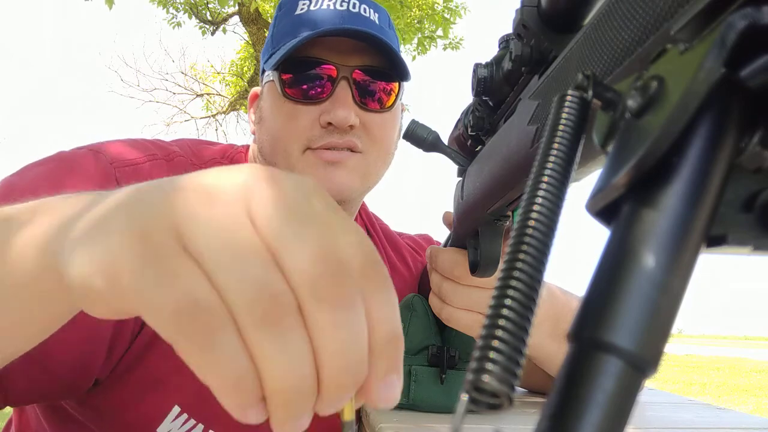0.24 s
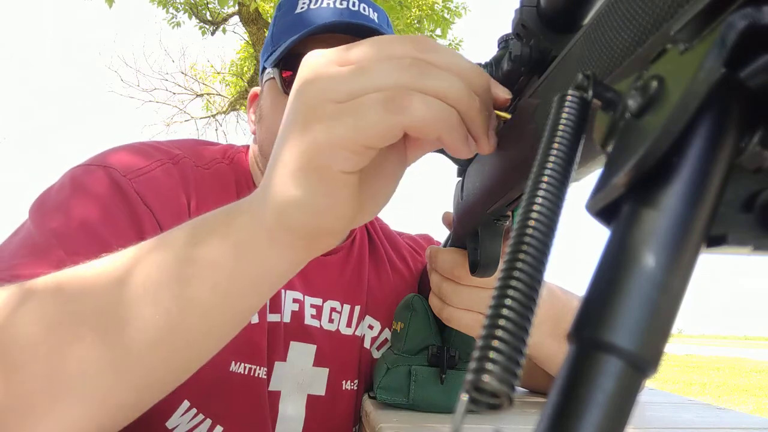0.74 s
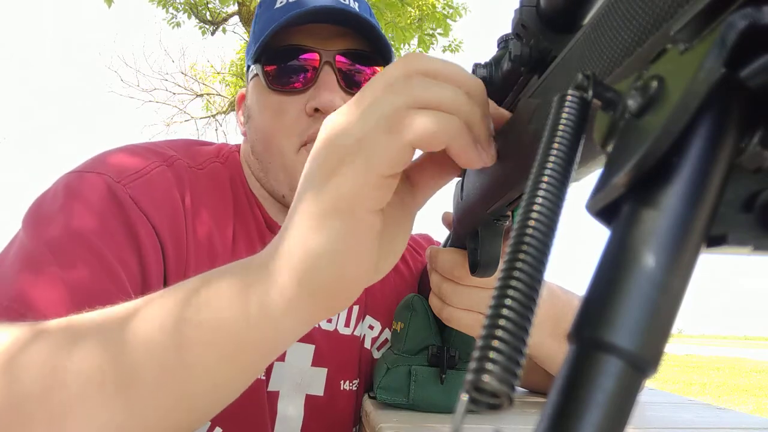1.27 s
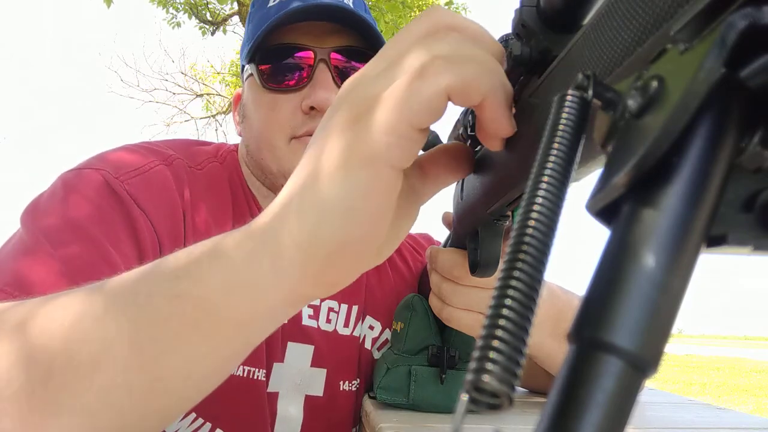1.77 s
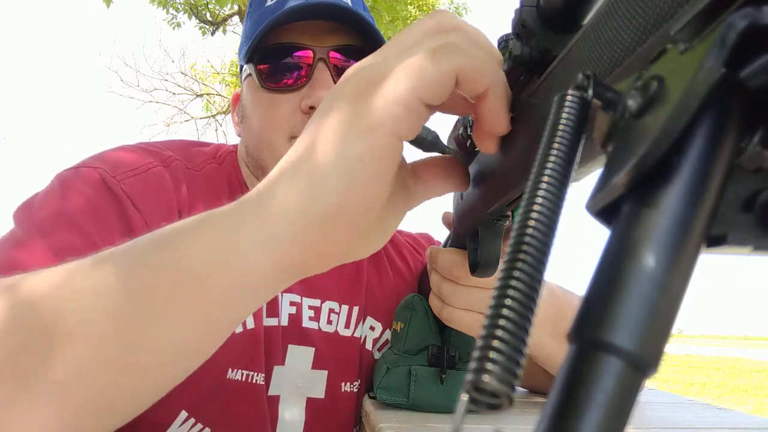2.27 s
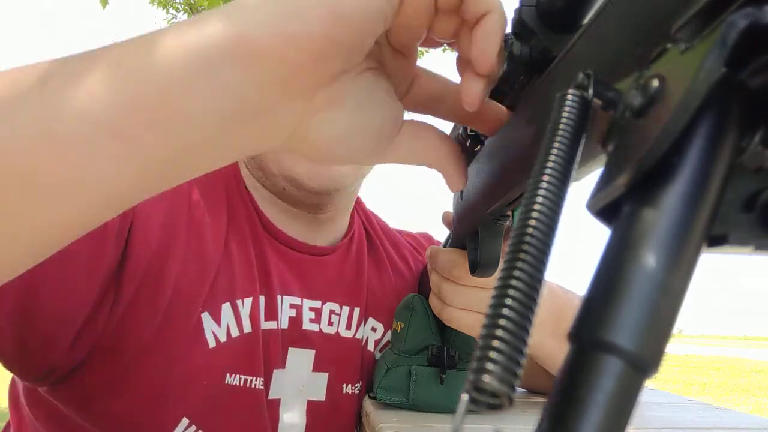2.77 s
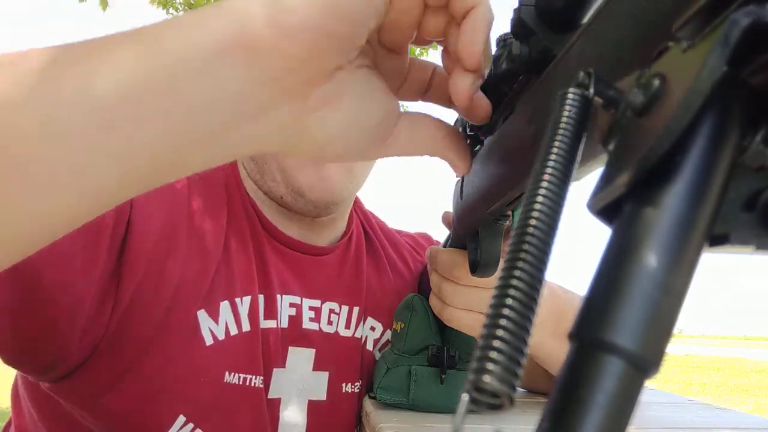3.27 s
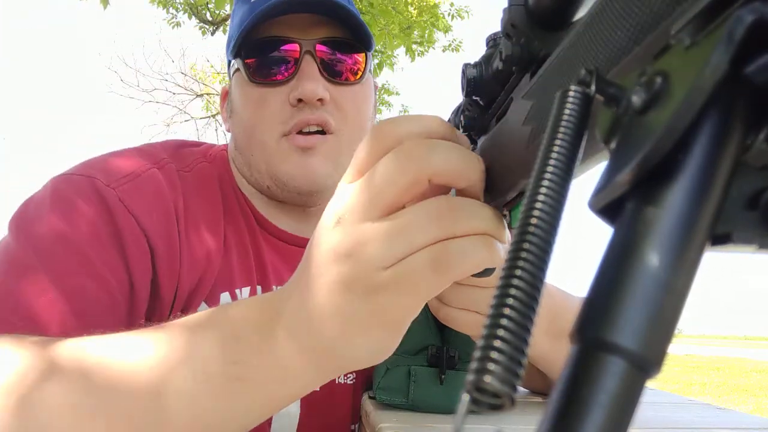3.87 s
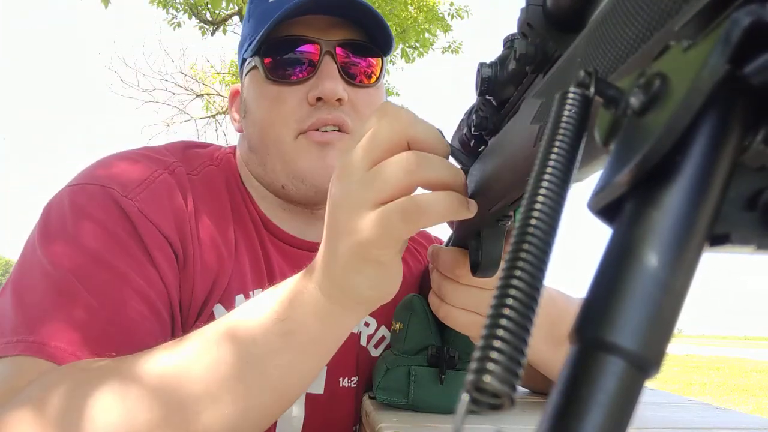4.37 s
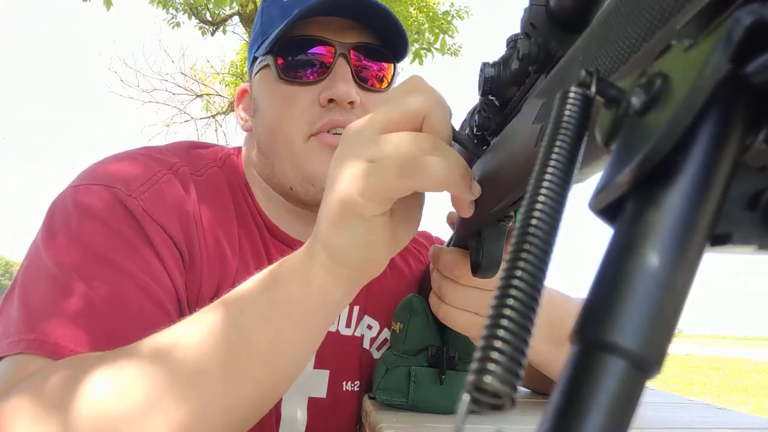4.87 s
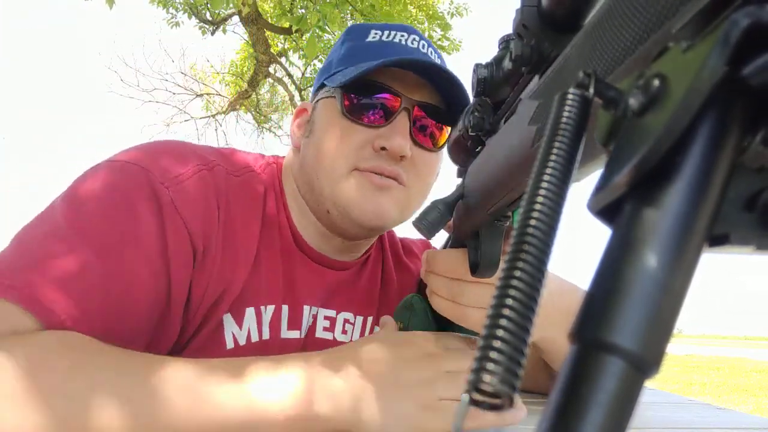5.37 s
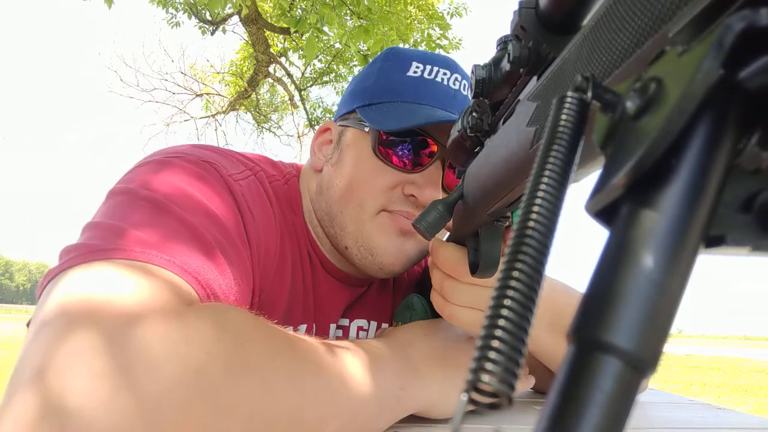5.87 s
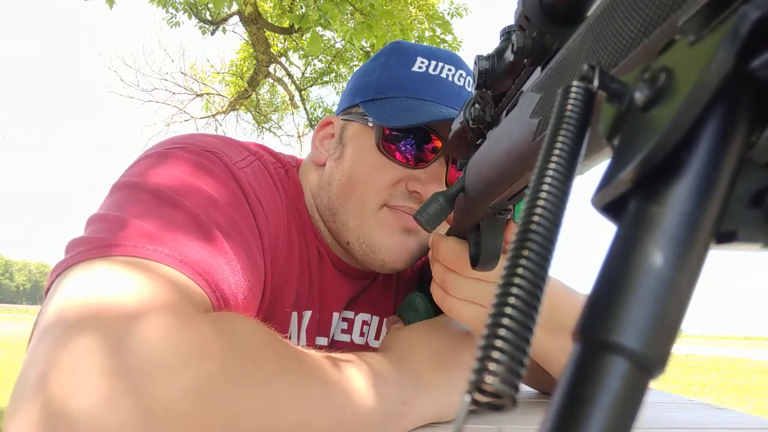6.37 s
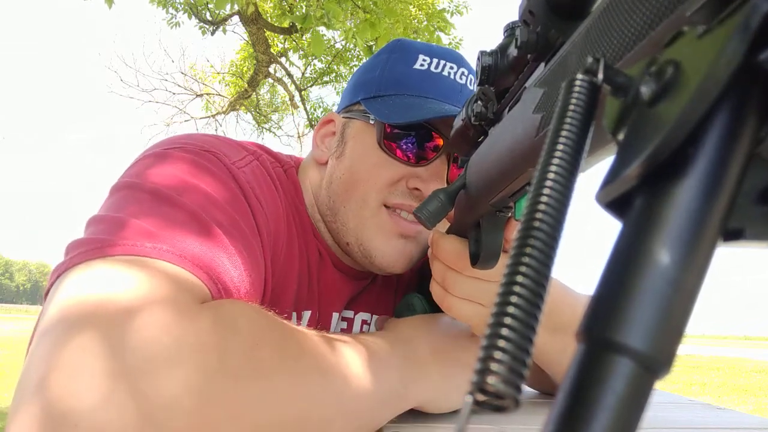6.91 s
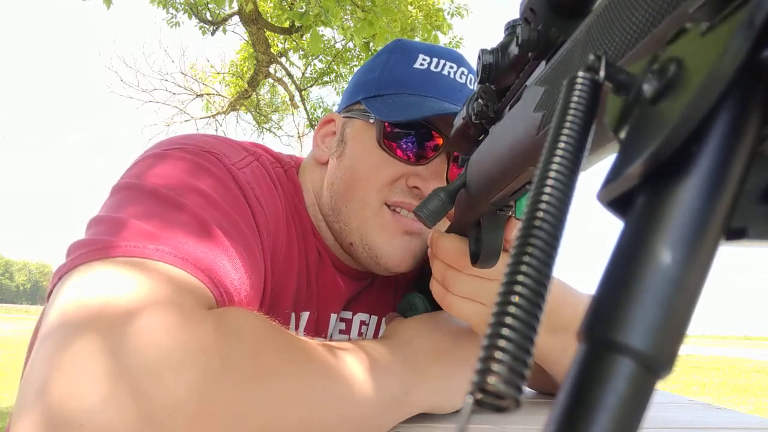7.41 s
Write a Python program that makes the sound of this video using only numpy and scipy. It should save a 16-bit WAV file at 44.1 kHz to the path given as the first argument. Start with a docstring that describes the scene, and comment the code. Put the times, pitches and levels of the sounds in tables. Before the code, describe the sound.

A rifle bolt is worked by hand outdoors: faint clicks, then quick metallic rattling ending in two sharp clacks, with distant birds chirping.

```python
"""At an outdoor bench, a cartridge is fed into a bolt-action rifle close to the microphone.
Brass and steel tick faintly, the bolt slides forward and strikes home, and its handle locks down
with two clacks. Each blow is a tiny rattle that makes the steel ring; heavy ones shake the bench.
Arms rub over the bench, a breeze bumps the microphone, and small birds call from far trees."""
import sys
import numpy as np
from scipy import signal
from scipy.fft import rfft, irfft
from scipy.io import wavfile
from scipy.ndimage import uniform_filter1d

SR = 44100
rng = np.random.default_rng(int(sys.argv[2]) if len(sys.argv) > 2 else 0)


def master(y):
    """Save y as 16-bit WAV."""
    cut = np.clip(np.atleast_2d(y).T, -1, 1)
    pcm = np.round(cut * 32767)  # scale
    wavfile.write(sys.argv[1], SR, pcm.astype(np.int16))


N = 337177

# The bolt strikes home, turns, rebounds and locks. Each row: start in seconds, level in dB,
# brightness in dB per octave, contact in seconds, fade in seconds (a fade is a drop of 60 dB).
CLACKS = [(4.9073, -8.5, .7, 0.004, .013), (5.0885, -15.5, 0.8, 0.0031, 0.026),
          (5.096, -21.5, -2.5, 0.0031, 0.0077), (5.1564, -15, -1, 0.0041, .019)]
# Where each clack lands: 0 is the breech face, 1 the cam, 2 the handle seat.
CLACK_PLACES = [0, 1, 1, 2]
# The notes of the steel action. Each row: pitch in Hz, width in Hz (widened to a minimum),
# then relative strength in dB for each of the three places.
STEEL_NOTES = [(546, 61, 2, 6, 13.5), (731, 45, -3.5, 9, 8), (933, 43, 5.5, 8.5, 7),
               (1280, 140, 10, 11.5, 9.5), (1490, 45, 3, 11, -22), (1624, 42, 0.5, 15, -3),
               (1760, 110, 10, -11, 6), (2118, 100, -1, 15, 9), (2330, 190, 3, 5, 10),
               (2710, 110, 4, 7.5, 4), (2950, 95, -3, 12.5, -17), (3600, 80, 2.5, -8.5, -5),
               (3496, 63, 1, 11.5, -21), (3860, 80, -6, 12.5, 2), (3973, 91, 3, 1.5, 4.5),
               (4167, 98, 7, 10, 10), (4950, 63, -3.5, 2.5, 6), (5160, 57, 4, 2, 9),
               (5500, 100, 6, 10.5, -7.5), (6300, 240, 4.5, 5.5, -8), (6100, 240, 8, -7, 5),
               (6500, 120, -4.5, -13, 12.5), (6884, 130, 0.5, -13, 8), (7520, 290, 7.5, 4.5, 6)]
# The tone of steel hitting steel. Each row: frequency in Hz, relative level in dB.
BLOW_TONE = [(30, -55), (130, -22), (320, -9), (700, -5), (1450, 1.5), (2400, -2), (3900, -2), (6300, -2),
             (11300, -3.5), (16000, -5.5)]
# For each place, the gain of the after-ring in dB, added to the level of the clack.
RING_DB = [-34, -33, -43]


def bolt_clacks(min_width_hz=85, notes_db=3):
    """Hard blows ring the steel in short, broad notes."""
    out = np.zeros(N)
    for (start, db, tilt_db, contact, fade), place in zip(CLACKS, CLACK_PLACES):
        notes = [(hz, max(width, min_width_hz), dbs[place] + notes_db)
                 for hz, width, *dbs in STEEL_NOTES]
        burst = rattle(contact, fade, passes=16, rise_s=.00045)
        clack = strike(burst, db, lambda f: amp(read(BLOW_TONE, f) + tilt_db * np.log2(f + 1)), notes)
        add(out, start, clack)
        add(out, start, amp(db + RING_DB[place]) * after_ring())
    return out


# The lingering notes of the rifle. Each row: pitch in Hz, relative level in dB, fade in seconds.
RING_NOTES = [(277.2, -9, 0.36), (603, -5, 0.41), (860.5, -1.5, 0.42), (1140, -2, .36), (1384, -3.5, 0.15),
              (2080, -9.5, 0.59), (2520, -0.5, .07), (2692, 0.5, 0.12), (4064, -6.5, .13), (4357, -11, .16),
              (5324, -1, 0.065), (5900, 4.5, 0.051), (6307, 3, .06), (6846, -2, .12), (7144, 3.5, .09),
              (7300, 3, 0.16), (8000, -1, .1), (9600, -3, .07)]


def after_ring():
    """Barrel, springs and bipod sing on faintly after a hard blow."""
    t = np.arange(SR // 2) / SR
    ring = sum(amp(db - 60 * t / fade) * sine(hz, t) for hz, db, fade in RING_NOTES)
    return ring * (1 - np.exp(-t / .002))


# Low thuds. Each row: start in seconds, level in dB, pitch in Hz, fade in seconds.
THUDS = [(4.916, -27, 139.5, 0.051), (5.09, -37.5, 179, 0.15), (5.158, -17.5, 239.7, 0.042),
         (5.16, -25, 138, .08), (5.177, -24, 196, 0.08), (5.159, -33, 484, .035)]


def thuds():
    """Heavy blows shake the stock and the bench."""
    out, t = np.zeros(N), np.arange(SR // 3) / SR
    for start, db, hz, fade in THUDS:
        onset = 1 - np.exp(-t / .0011)
        add(out, start, amp(db - 60 * t / fade) * np.sin(2 * np.pi * hz * t) * onset)
    return out


# The cartridge ticks against the action.
# Each row: start in seconds, level in dB, centre in Hz, width in octaves.
TICKS = [(.869, -47.5, 1790, 1.2), (.9746, -48.5, 3780, 1.1), (.982, -50, 2800, 2.3),
         (.994, -55, 3500, 3.1), (1.005, -52, 9000, .8), (1.035, -47, 3000, 3.5), (1.049, -47, 2980, 0.98),
         (1.06, -52.5, 2400, 0.68), (1.4942, -48.5, 1190, 1.16), (1.6745, -57.5, 2100, 0.95),
         (1.978, -58, 1000, 1.4), (2.1, -53, 2100, 0.63), (2.483, -62, 5900, .45),
         (3.8087, -45.5, 6000, 1.3), (4.2205, -59.5, 4500, 1.6)]
# Light knocks on bench and stock, and of the bolt along its rails. Rows are as in TICKS.
KNOCKS = [(.012, -55.5, 900, 1.7), (.194, -52, 850, 1.9), (.212, -51, 600, 2.8), (.236, -52.5, 700, 2.6),
          (3.026, -55.5, 900, 1.75), (4.4225, -44.5, 1195, 1.28), (4.478, -47.5, 2965, 4.3),
          (4.484, -40, 1700, 1.1), (4.491, -41.5, 600, 1.2), (4.528, -53, 1017, 0.89),
          (4.55, -51, 1498, 2.5), (4.5743, -38.5, 4443, 5.2), (4.656, -40, 700, 1.7),
          (4.662, -48, 850, 0.82), (4.781, -53, 604.5, 0.8), (4.7854, -42.5, 1196, 1.1),
          (4.898, -36, 2192, 1.4), (5.07, -38, 800, 1.4), (5.3588, -47.5, 6200, 0.3),
          (7.072, -60, 608, 3.1)]
# The notes of the loose cartridge in the open action.
# Each row: pitch in Hz, width in Hz, relative strength in dB.
LOOSE_NOTES = [(760, 39, 4.5), (1275, 99, 2.5), (1444, 88, 6.5), (2040, 59, 6.5), (2310, 90, 2),
               (2950, 750, 1), (3620, 130, -5), (4200, 120, 5.5), (4994, 360, 2), (5540, 110, 4.5),
               (7000, 220, 7), (7900, 230, 2.5), (10500, 500, 6)]


def touches(rows, lowest_hz, notes_db=2):
    """Light touches rattle loose parts, which give off little below their lowest note."""
    out = np.zeros(N)
    notes = [(hz, width, db + notes_db) for hz, width, db in LOOSE_NOTES]
    for start, db, centre_hz, octaves in rows:
        def tone(f):
            return hump(f, centre_hz, octaves) / np.sqrt(1 + (lowest_hz / (f + 1)) ** 8)
        fade = .035 * (1500 / centre_hz) ** .57  # brighter touches die sooner
        burst = rattle(contact_s=.0008, fade_s=fade, passes=2, rise_s=.00028)
        add(out, start, strike(burst, db, tone, notes))
    return out


def rattle(contact_s, fade_s, passes, rise_s, size=8192):
    """Metal faces chatter for a moment: a burst with all frequencies about equally strong."""
    t = np.arange(size) / SR
    decay = amp(-60 * np.maximum(t - contact_s, 0) / fade_s)
    shape = decay * (1 - np.exp(-t / rise_s)) + 1e-9
    burst = rng.standard_normal(size) * shape
    for _ in range(passes):
        burst *= shape / running_level(burst, 64)
        burst = irfft(np.exp(1j * np.angle(rfft(burst))))  # give every frequency the same strength
    return burst * shape / running_level(burst, 128)


def strike(burst, db, tone, notes):
    """A burst, coloured by how hard the contact is, wakes the notes of the metal."""
    f = np.fft.rfftfreq(len(burst), 1 / SR)
    peaks = sum(amp(note_db) ** 2 / (1 + (2 * (f - hz) / width) ** 2) for hz, width, note_db in notes)
    soft_top = amp(read([(7800, 5), (8300, 2.5), (16000, -8)], f))
    sound = irfft(rfft(burst) * prompt_filter(np.sqrt(1 + peaks) * soft_top * tone(f)))
    return amp(db) * sound * np.sqrt(.01 * SR / np.sum(sound ** 2))  # level as if it all took 10 ms


# Touches on the brass case. Each row: start in seconds, level in dB, fade in seconds.
CLINKS = [(0.196, -57.5, 0.11), (.976, -45, .07), (.982, -53, 0.058), (3.811, -35.5, 0.019)]
# The notes of the case. Each row: pitch in Hz, relative level in dB.
BRASS_NOTES = [(3230, -9), (4690, 2), (4970, -2.5), (5230, 0), (5460, 0), (10600, -15.5)]


def brass_clinks():
    """The thin case rings with a cluster of high notes, more briefly when held tight."""
    out, t = np.zeros(N), np.arange(SR // 3) / SR
    for start, db, fade in CLINKS:
        ring = sum(amp(note_db) * sine(hz, t) for hz, note_db in BRASS_NOTES)
        add(out, start, amp(db - 60 * t / fade) * ring * (1 - np.exp(-t / .0005)))
    return out


# Scrapes and rustles of steel, skin and cloth.
# Each row: middle in seconds, length in seconds, level in dB, centre in Hz, width in octaves.
RUBS = [(.02, 0.045, -53, 3430, 1.6), (0.147, 0.14, -62, 4240, 0.75), (.217, 0.08, -56.5, 1490, 0.62),
        (1.006, 0.047, -59, 5500, 1.3), (4.521, 0.2, -54.5, 2120, 1.25), (4.894, 0.037, -49, 2180, 1.8),
        (5.036, 0.14, -58, 2200, 1.7), (5.431, 0.18, -58, 4460, 1.6), (5.849, 0.65, -67, 4000, 1),
        (6.109, .12, -54.5, 378, 1.38), (6.201, 0.18, -58, 4420, 1), (6.852, 0.55, -68, 5050, 1),
        (7.122, 0.24, -61.5, 692, 1.72), (7.382, 0.054, -54.5, 4620, 0.35)]
# How the microphone colours rubs and air. Each row: frequency in Hz, relative level in dB.
MICROPHONE_TONE = [(20, 1), (7700, 2), (8300, -2.5), (16000, -1.5)]


def rubs(grain_db=3):
    """Surfaces stick and slip, breaking a swell of hiss into grains."""
    out = np.zeros(N)
    for middle, length, db, hz, octaves in RUBS:
        size = int(length * SR)
        hiss = noise(size, lambda f: hump(f, hz, octaves) * amp(2 * read(MICROPHONE_TONE, f)))
        grains = amp(grain_db * wobble(size, below_hz=200))
        add(out, middle - length / 2, amp(db) * unit_level(hiss * grains) * np.sqrt(np.hanning(size)))
    return out


# The tone of the bounce off bench and body. Each row: frequency in Hz, relative level in dB.
BOUNCE_TONE = [(150, 4), (350, 11), (700, -1), (1500, -9.5), (3000, -4.5), (7000, -1), (9000, 1.5),
               (16000, -5)]
# How long the surroundings echo. Each row: frequency in Hz, fade in seconds.
OUTDOOR_FADES = [(150, .16), (600, 0.78), (2000, 0.23), (6500, .7), (10000, .5), (15000, .25)]


def echoes(sound, near_db=-18, near_fade_s=.091, far_db=-33):
    """Sound bounces quickly off bench and body, then a thin tail returns from farther away."""
    t = np.arange(SR) / SR
    near = noise(SR, lambda f: amp(read(BOUNCE_TONE, f))) * amp(-60 * t / near_fade_s) * (t > .005)
    far_tone = [(200, 15), (900, 4), (3000, -2), (7500, -2.5), (8500, 1), (11000, -.5), (15000, -12)]
    hz, times, bands = signal.stft(noise(SR, lambda f: amp(read(far_tone, f))), SR, nperseg=256)
    bands *= amp(-60 * times / read(OUTDOOR_FADES, hz)[:, None])
    far = signal.istft(bands, SR, nperseg=256)[1][:SR] * (t > .012)
    bounces = amp(near_db) * near / np.linalg.norm(near) + amp(far_db) * far / np.linalg.norm(far)
    return signal.fftconvolve(sound, bounces)[:N]


# Puffs of wind. Each row: start in seconds, length in seconds, level in dB, centre in Hz.
GUSTS = [(0.211, 0.048, -51, 132), (0.278, 0.079, -41, 68), (0.356, 0.081, -41, 62.4),
         (.995, 0.065, -47.5, 57.5), (1.058, 0.059, -50, 73.5), (3.991, 0.087, -52.5, 59.6),
         (4.5, 0.112, -48.5, 65.6), (5.493, 0.13, -49.5, 72.3), (5.682, 0.072, -39.5, 92.7),
         (5.768, 0.045, -48.5, 85), (5.826, 0.14, -43.5, 78.5), (6.061, 0.13, -45.5, 90),
         (6.321, 0.056, -53.5, 50.3), (6.928, 0.094, -44.5, 97.5), (7.036, 0.1, -48.5, 70),
         (7.27, .11, -38.5, 102.2), (7.366, 0.1, -44, 65), (7.446, 0.14, -39, 98),
         (7.595, 0.088, -40.5, 70.4)]


def breeze():
    """Swirls of air push on the microphone in short, low gusts."""
    out = np.zeros(N)
    for start, length, db, hz in GUSTS:
        size = int(length * SR)
        swirls = noise(SR // 2, lambda f: hump(f, hz, octaves=.66))
        swirls /= running_level(swirls, 1500, mode="wrap")
        add(out, start, amp(db) * swirls[:size] * signal.windows.tukey(size, .46))
    return out


# One zigzagging twitter. Each row: seconds from its start, pitch in Hz, relative level in dB.
TWITTER_SHAPE = [(0, 3360, -18), (.012, 4700, -10.5), (.02, 5420, -11.5), (.031, 5000, -10.5),
                 (.044, 4250, -4), (0.055, 3434, -16), (.064, 3446, -6.5), (.071, 2970, -23),
                 (.081, 3550, -7), (.096, 4450, -16), (.105, 3566, -7.5), (0.115, 3170, -12),
                 (0.123, 2860, -23)]
# Its repeats. Each row: start in seconds, level in dB.
TWITTERS = [(2.325, -50), (3.445, -49.5), (5.336, -47), (7.323, -48)]


def bird_twitters(rasp=.032):
    """A bird repeats one whistled figure, its pitch shaking."""
    out = np.zeros(N)
    times, hz, db = np.transpose(TWITTER_SHAPE)
    t = np.arange(0, times[-1], 1 / SR)
    for start, level_db in TWITTERS:
        pitch = np.interp(t, times, hz) * (1 + rasp * wobble(len(t), below_hz=300))
        loudness = amp(level_db + np.interp(t, times, db))
        add(out, start, loudness * np.sin(2 * np.pi * np.cumsum(pitch) / SR))
    return through_trees(out, haze_db=-2.5, fade_s=.53)


# One bird peeps on a single note. Each row: start in seconds, level in dB.
PEEPS = [(.46, -68), (1.44, -60), (1.82, -69), (2.065, -67), (2.565, -69), (2.875, -66.5), (3.61, -67),
         (4.075, -69)]
# Another buzzes on two notes at once.
# Each row: start in seconds, length in seconds, level of the upper note in dB.
BUZZES = [(1.338, 0.13, -68.5), (3.073, .17, -69), (3.872, 0.17, -69.5), (4.212, 0.21, -69),
          (6.861, 0.18, -71)]
# A third slides up or down.
# Each row: start in seconds, length in seconds, level in dB, first and last pitch in Hz.
SLIDES = [(1.498, 0.052, -64, 3030, 2930), (2.039, 0.093, -67.5, 2876, 3000), (3.03, .035, -71, 5100, 5460),
          (4.005, 0.086, -70, 4000, 2870), (4.437, .035, -63, 4140, 4290), (4.68, 0.071, -69, 4570, 4830),
          (4.73, 0.037, -68.5, 4600, 3730)]


def bird_calls():
    """Three far birds peep, buzz and slide between notes."""
    out = np.zeros(N)
    for start, db in PEEPS:
        add(out, start, whistle(.045, db, 5220, 5220, blur_hz=140))
    for start, length, db in BUZZES:
        add(out, start, whistle(length, db, 4610, 4610, blur_hz=785))
        add(out, start, whistle(length, db - 5, 3600, 3600, blur_hz=303))
    for start, length, db, first_hz, last_hz in SLIDES:
        add(out, start, whistle(length, db, first_hz, last_hz, blur_hz=110))
    return through_trees(out, haze_db=-3.5, fade_s=.32)


def whistle(length_s, db, first_hz, last_hz, blur_hz):
    """A held or gliding note, blurred into a narrow band of noise."""
    size = int(length_s * SR)
    blur = signal.hilbert(noise(SR // 2, lambda f: np.exp(-(f / blur_hz) ** 2)))[:size]
    pitch = np.linspace(first_hz, last_hz, size) - blur_hz / 2  # centres the band on the note
    note = (blur * np.exp(2j * np.pi * np.cumsum(pitch) / SR)).real
    return amp(db) * unit_level(note) * signal.windows.tukey(size, .7)


# The course of one squeal. Each row: time in seconds, pitch in Hz, level in dB.
SQUEAL_SHAPE = [(6.16, 1930, -72), (6.22, 1900, -60), (6.27, 1900, -55.5), (6.33, 1890, -61),
                (6.37, 1870, -63), (6.42, 1890, -97)]
# The tones in it. Each row: multiple of the pitch, relative level in dB.
SQUEAL_TONES = [(1, -0.5), (2, 13), (3, 2)]


def bird_squeal(waver=.0047):
    """A bird gives one thin, slightly falling cry with overtones."""
    out = np.zeros(N)
    times, hz, db = np.transpose(SQUEAL_SHAPE)
    t = np.arange(times[0], times[-1], 1 / SR)
    pitch = np.interp(t, times, hz) * (1 + waver * wobble(len(t), below_hz=120))
    cycles = np.cumsum(pitch) / SR
    cry = sum(amp(tone_db) * np.sin(2 * np.pi * k * cycles) for k, tone_db in SQUEAL_TONES)
    add(out, times[0], amp(np.interp(t, times, db)) * unit_level(cry))
    return out


def through_trees(sound, haze_db, fade_s):
    """Leaves and trunks scatter a far sound, adding a haze to it."""
    t = np.arange(SR // 2) / SR
    leaves = rng.standard_normal(len(t)) * amp(-60 * t / fade_s)
    return sound + amp(haze_db) * signal.fftconvolve(sound, leaves / np.linalg.norm(leaves))[:N]


# The tone of the open air. Each row: frequency in Hz, relative level in dB.
AIR_TONE = [(15, -60), (25, -33), (50, -5.5), (74, 1.5), (175, -10), (293, -18), (394, -15), (427, -18),
            (503, -18), (1130, -23.5), (2690, -28), (3620, -29), (5280, -31.5), (5730, -32.5),
            (16000, -35.5)]


def air(db=-56):
    """A steady outdoor hush lies over a distant low drone."""
    return amp(db) * noise(N, lambda f: amp(read(AIR_TONE, f) + read(MICROPHONE_TONE, f)))


def amp(db):
    """Turns decibels into a gain."""
    return 10 ** (np.asarray(db) / 20)


def unit_level(x):
    """Scales a sound to an average (rms) level of one."""
    return x / np.sqrt(np.mean(x ** 2) + 1e-20)


def running_level(x, size, mode="reflect"):
    """The average (rms) level of the samples around each moment."""
    return np.sqrt(abs(uniform_filter1d(x ** 2, size=size, mode=mode)) + 1e-14)


def read(points, hz):
    """Reads between the rows of a table, with octaves evenly spaced."""
    f, value = np.transpose(points)
    return np.interp(np.log(hz + 1), np.log(f + 1), value)


def hump(hz, centre_hz, octaves):
    """A bell-shaped gain around one frequency."""
    return np.exp(-.5 * (np.log2((hz + 1) / centre_hz) / octaves) ** 2)


def add(mix, start, sound):
    """Lays a sound into the mix at a start time in seconds."""
    part = mix[max(round(start * SR), 0):][:len(sound)]
    part += sound[:len(part)]


def sine(hz, t):
    """A pure note that starts anywhere in its cycle."""
    return np.sin(2 * np.pi * (hz * t + rng.random()))


def noise(size, tone):
    """Noise of level one, shaped by the gain tone(Hz)."""
    spectrum = rfft(rng.standard_normal(size)) * tone(np.fft.rfftfreq(size, 1 / SR))
    return unit_level(irfft(spectrum, size))


def wobble(size, below_hz):
    """A random tremble, mostly slower than the given rate."""
    return noise(size, lambda f: 1 / (1 + (f / below_hz) ** 2))


def prompt_filter(gain):
    """The spectrum of the filter with this gain that answers soonest, never before the hit."""
    log_gain = np.log(np.maximum(gain / gain.max(), 1e-5))
    mirrored = np.concatenate([log_gain, log_gain[-2:0:-1]])
    return np.exp(np.conj(signal.hilbert(mirrored)))[:len(gain)]


def scene():
    """The rifle close by, with the outdoors behind it."""
    handling = touches(TICKS, lowest_hz=1070) + touches(KNOCKS, lowest_hz=340)
    close = handling + bolt_clacks() + thuds() + brass_clinks() + rubs()
    outdoors = echoes(close) + breeze() + bird_calls() + bird_twitters() + bird_squeal() + air()
    return (close + outdoors)[None]


def record(dry, low_cut_hz=21, ceiling=.73, high_cut_hz=16200):
    """The microphone sheds the deepest rumble, rounds off loud peaks and drops the highest treble."""
    lean = signal.sosfilt(signal.butter(2, low_cut_hz, "highpass", fs=SR, output="sos"), dry)
    rounded = lean / (1 + (lean / ceiling) ** 6) ** (1 / 6)
    treble_cut = signal.firwin(511, high_cut_hz, window=("kaiser", 9), fs=SR)
    return signal.oaconvolve(rounded, treble_cut[None], "same")


dry = scene()
out = record(dry)
master(out)
```